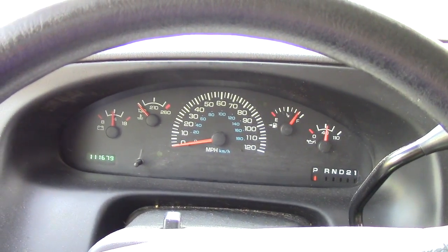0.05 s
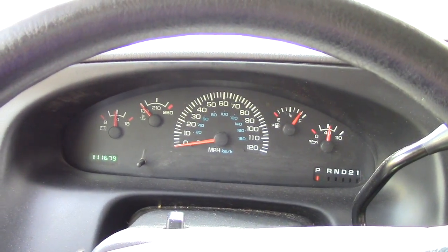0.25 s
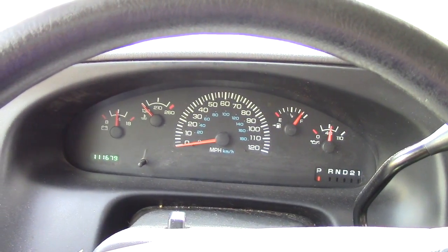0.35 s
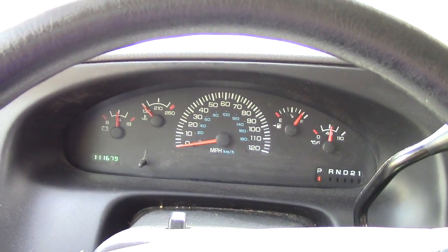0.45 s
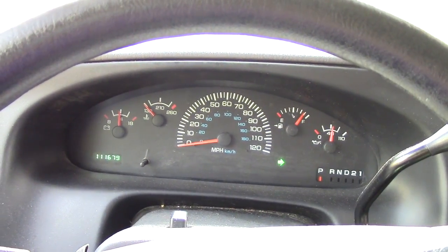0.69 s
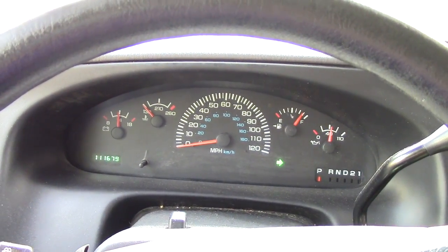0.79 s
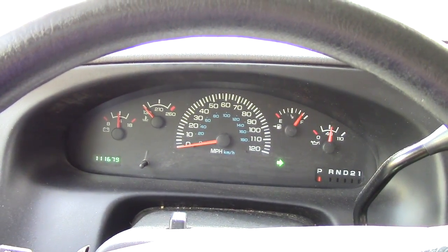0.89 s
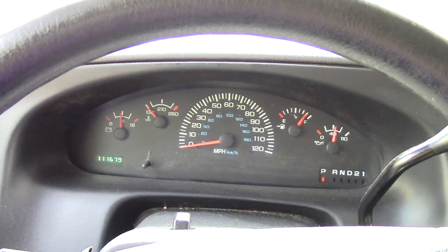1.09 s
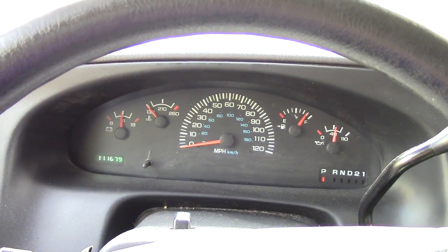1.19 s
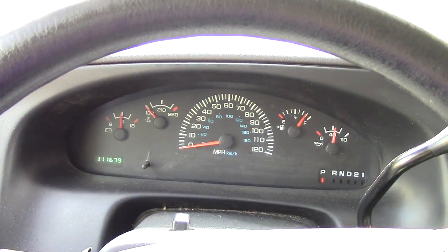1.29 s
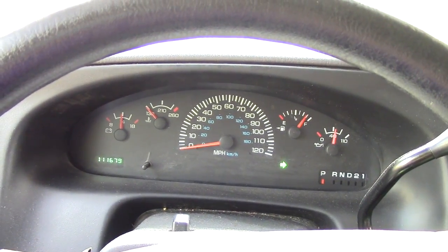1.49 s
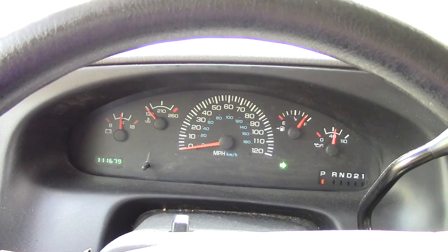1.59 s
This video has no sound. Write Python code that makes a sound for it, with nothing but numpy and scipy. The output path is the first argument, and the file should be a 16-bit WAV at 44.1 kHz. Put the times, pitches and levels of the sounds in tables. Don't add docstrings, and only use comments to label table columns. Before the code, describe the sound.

Inside a parked vehicle, soft idle hum and hiss run throughout; a hard stalk clack comes early, lighter relay clicks follow, a second weaker clack lands midway, then more ticks, heard close and dry in stereo.

```python
import sys
import numpy as np
from scipy import signal
from scipy.fft import rfft, irfft
from scipy.io import wavfile
from scipy.ndimage import uniform_filter1d

SR = 44100
rng = np.random.default_rng(int(sys.argv[2]) if len(sys.argv) > 2 else 0)


def dump_mix(stems):
    frames = np.atleast_2d(stems).T
    limited = np.clip(frames, -1, 1)
    pcm = np.round(limited * 32767).astype(np.int16)
    wavfile.write(sys.argv[1], SR, pcm)


def undo_db(level):
    steps = np.asarray(level, float) / 20
    return 10 ** steps


N = 72765

LEFT_RIGHT = np.array([[0.5], [-0.5]])


def evened(x):
    return x / np.sqrt(np.mean(x ** 2) + 1e-20)


def read(points, hz):
    f, value = np.transpose(points)
    return np.interp(np.log(hz + 1), np.log(f + 1), value)


def pair(shape, likeness):
    a, b, c, d = rng.standard_normal(shape[::-1] + (4,)).T
    same = np.clip(likeness, -1, 1)[:, None]
    left = a + 1j * b
    other = c + 1j * d
    return np.array([left, same * left + np.sqrt(1 - same ** 2) * other])


def causal(gain):
    log_gain = np.log(gain + 1e-5 * gain.max())
    circle = np.concatenate([log_gain, log_gain[..., -2:0:-1]], axis=-1)
    return np.exp(np.conj(signal.hilbert(circle)))[..., :gain.shape[-1]]


def whitened(x):
    even_bins = 48
    z = rfft(x)
    power = uniform_filter1d(abs(z) ** 2, even_bins * x.shape[1] // 4096, axis=1)
    return irfft(z * causal(np.sqrt(power.mean(1, keepdims=True) / power)), x.shape[1])


def idle():
    # (f/Hz, density/dB per Hz)
    wash_colour = [(18, -70), (30, -29), (124, -15.5), (161, -6), (524, -9), (756, -9), (933, -8),
                   (6010, -17.5), (15900, -36.5)]
    # (f/Hz, width/Hz, level/dB)
    booms = [(270, 37, 7), (559, 240, 9), (1010, 27, 3.5), (5470, 550, 0.5)]
    # (f/Hz, likeness 0 to 1)
    likeness = [(40, 0.57), (100, 1), (500, 0.56), (1500, 0.28), (5000, 0.7), (12000, .2)]
    # (f/Hz, level/dB)
    lean = [(60, 4), (240, 2.5), (950, 0), (3770, 0.5), (15000, 0)]
    wash_db, hum_db, hum_hz = -51, -75.5, 70
    throb_db, throb_hz, patch_db = 0, 19, 2

    frames, hz = N // 128 + 5, np.fft.rfftfreq(512, 1 / SR)
    t = np.arange(frames) * 128 / SR
    patches = rng.standard_normal((frames, 257)).T
    patches = uniform_filter1d(patches, size=6, axis=0)
    patches = evened(uniform_filter1d(patches, size=16, axis=1))
    throb = throb_db * np.sin(2 * np.pi * throb_hz * t) / (1 + (hz[:, None] / 900) ** 2)
    noise = pair((257, frames), read(likeness, hz)) * undo_db(patch_db * patches + throb)
    wash = signal.istft(noise, nperseg=512, noverlap=384)[1][:, :N]

    fine = np.fft.rfftfreq(N, 1 / SR)
    colour = read(wash_colour, fine)
    for f, width, db in booms:
        colour = colour + db / (1 + (2 * (fine - f) / width) ** 2)
    wash = irfft(rfft(wash) * undo_db(colour + LEFT_RIGHT * read(lean, fine)), N)
    hum = np.sqrt(2) * np.sin(2 * np.pi * hum_hz * np.arange(N) / SR)
    return undo_db(wash_db) * evened(wash) + undo_db(hum_db) * hum


def ring(modes, hz):
    detune, scatter_db = 0.02, 1
    f, db, t60 = np.transpose(modes)[:, :, None]
    off, size = rng.standard_normal((2, len(modes), 1))
    distance = (hz - f * (1 + detune * off)) * t60 / 1.29
    return (undo_db(2 * (db + scatter_db * size)) / (1 + distance ** 2)).sum(0)


def cabin():
    # (f/Hz, t60/s)
    tail_t60 = [(300, 0.22), (1000, 0.12), (3000, 0.046), (8000, 0.035), (14000, 0.019)]
    # (f/Hz, likeness 0 to 1)
    likeness = [(300, 0.98), (2000, 1), (6000, 0.17), (12000, .1)]
    hz, t = np.fft.rfftfreq(128, 1 / SR), np.arange(260) * 32 / SR
    z = pair((65, 260), read(likeness, hz)) * undo_db(-60 * t / read(tail_t60, hz)[:, None])
    tail = signal.istft(z, nperseg=128, noverlap=96)[1]
    tail = tail * np.clip((np.arange(tail.shape[1]) / SR - 0.0008) / 0.0012, 0, 1)
    return whitened(tail / np.linalg.norm(tail[0]))


def clicks(events, modes, pan_db):
    # (f/Hz, peak/dB, t60/s)
    dash_modes = [(247, 9, 0.15), (295.7, 10.5, 0.16), (379, 6, .035), (513, 7.5, 0.042), (690, 9, 0.033),
                  (793, 11, 0.052), (1020, 3, .018), (1060, -8, 0.015), (1330, 1.5, .012)]
    # (f/Hz, likeness 0 to 1)
    likeness = [(1000, 0.99), (3000, 0.94), (6000, 0.58), (12000, 0.022)]
    rise_s, crack_db, wet_db = 0.00069, -9.5, -5.5
    tilt_hz, tilt_max_db = 1186, 7
    mic_low_hz, mic_high_hz = 248, 10500

    t, out = np.arange(4096) / SR, np.zeros((2, N + SR))
    hz = np.fft.rfftfreq(len(t), 1 / SR)
    same = read(likeness, hz)
    crack = undo_db(2 * crack_db) * (hz / 1500) ** 2 / (1 + (hz / 1500) ** 2)
    octaves = np.log2(np.maximum(hz, tilt_hz) / 3000)
    for s, db, thud_db, tilt_db, chatter_t60 in events:
        noise = irfft(pair((len(same), 1), same)[:, :, 0])
        chatter = evened(noise) * np.minimum(t / rise_s, 1) * undo_db(-60 * t / max(chatter_t60, 0.002))
        chatter = whitened(chatter)

        power = crack + ring(modes, hz) + undo_db(2 * thud_db) * ring(dash_modes, hz)
        brightness = undo_db(np.clip(tilt_db, -tilt_max_db, tilt_max_db / 2) * octaves)
        body = irfft(causal(np.sqrt(power) * brightness))
        blow = signal.fftconvolve(chatter, body[None], axes=1)
        blow = blow / abs(blow).max()

        heard = undo_db(wet_db) * signal.fftconvolve(blow, cabin(), axes=1)
        heard[:, :blow.shape[1]] += blow
        at = max(round(s * SR), 0)
        out[:, at:at + heard.shape[1]] += heard * undo_db(db + LEFT_RIGHT * pan_db)
    low_cut = signal.butter(6, mic_low_hz, "high", fs=SR, output="sos")
    high_cut = signal.butter(4, mic_high_hz, fs=SR, output="sos")
    return signal.sosfilt(np.vstack([low_cut, high_cut]), out[:, :N])


def relay_snap():
    # (t/s, peak/dB, thud/dB, brightness/dB per octave, chatter t60/s)
    snaps = [
        (0.0003, -36, -4, 1, 0.033),
        (0.5541, -24, -26.5, -3, 0.014),
        (0.5572, -19.5, -30, -1.5, 0.015),
        (1.0173, -21, -28.5, 2.5, 0.009),
        (1.3475, -18.5, -33, -1.5, 0.011),
    ]
    # (f/Hz, peak/dB, t60/s)
    can_modes = [(1600, -7, 0.022), (2300, -6, 0.0061), (3320, -9, 0.0062), (4500, -23, 0.0086),
                 (5160, 5.5, .0075), (5430, 3.5, 0.0086), (6160, 9.5, 0.017), (8160, -6, 0.0057),
                 (10300, -25, 0.0021), (12000, -5, 0.0035), (14900, -34, 0.00061)]
    return clicks(snaps, can_modes, pan_db=3)


def stalk():
    # (t/s, peak/dB, thud/dB, brightness/dB per octave, chatter t60/s)
    knocks = [(0.2425, -27, -2, -1, 0.015), (0.2457, -12.5, -2, 3, 0.036),
              (0.2513, -3.5, -31.5, 0.5, 0.022), (0.2548, -7, 1.5, 6, 0.035),
              (0.2592, -14.5, -13, -2, .015), (0.2628, -14.5, -0.5, -2, 0.016),
              (0.2747, -24.5, 9.5, 0, 0.028), (0.3341, -32.5, -19, -6, 0.015),
              (0.4909, -26, -7.5, -5.5, 0.015), (0.5429, -29.5, -26, -2.5, 0.02),
              (0.7309, -22, 7, -2, 0.007), (0.7346, -17.5, 3.5, 0.5, 0.016),
              (0.7388, -10.5, -9.5, 1, 0.005), (0.7413, -20.5, -3, -3, 0.0078),
              (0.7696, -31.5, 0, -11.5, 0.019), (0.7911, -38, 5, -9, .012),
              (0.8718, -34, -14.5, -4.5, 0.0078), (1.0515, -46, 10, 12, 0.017)]
    # (f/Hz, peak/dB, t60/s)
    housing_modes = [(1560, 2, 0.014), (2500, 4, 0.01), (3030, 10.5, 0.0074), (3715, 5, 0.002),
                     (4730, -8, 0.0027), (5220, 1.5, .0045), (5930, 0, 0.0048), (8020, -4.5, 0.0028),
                     (9300, -9.5, 0.0017), (11950, -8, 0.0015)]
    return clicks(knocks, housing_modes, pan_db=2.5)


def relay_drop():
    # (t/s, peak/dB, thud/dB, brightness/dB per octave, chatter t60/s)
    drops = [
        (0.6043, -16.5, -13, -3.5, 0.0075),
        (0.9345, -30, -3.5, -8, 0.021),
        (0.9376, -17.5, -12, 1, 0.0049),
        (0.9398, -19, -36, -25, 0.0038),
    ]
    # (f/Hz, peak/dB, t60/s)
    can_modes = [(1960, -26, 0.0093), (2720, -18, 0.0077), (3470, 14, 0.0048), (4440, -1, 0.0055),
                 (5470, 10, 0.0036), (6210, 11, 0.012), (8200, 10.5, 0.0028), (8600, -8, 0.0074),
                 (11400, -5.5, 0.0017)]
    return clicks(drops, can_modes, pan_db=3)


def scene():
    return idle() + relay_snap() + stalk() + relay_drop()


def top_cut(x):
    return signal.sosfilt(signal.butter(12, 16020, fs=SR, output="sos"), x)


def record(dry):
    edge_hz = 15500
    band_limit = signal.firwin(255, edge_hz, window=("kaiser", 8), fs=SR)
    mix = signal.oaconvolve(dry, band_limit[None], "same")
    return top_cut(mix)


dry = scene()
out = record(dry)
dump_mix(out)
```